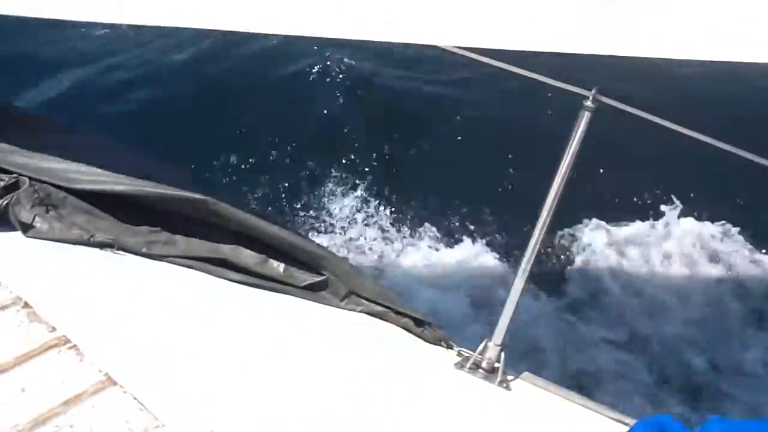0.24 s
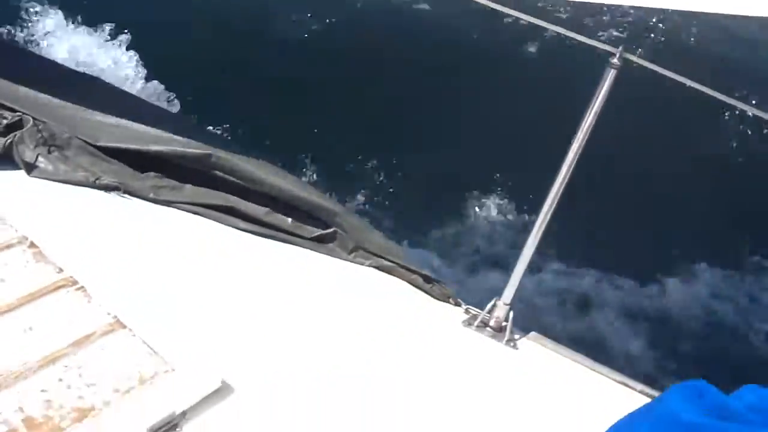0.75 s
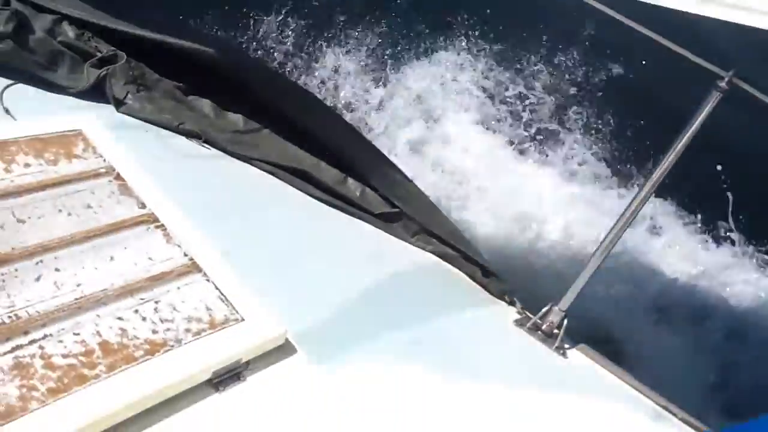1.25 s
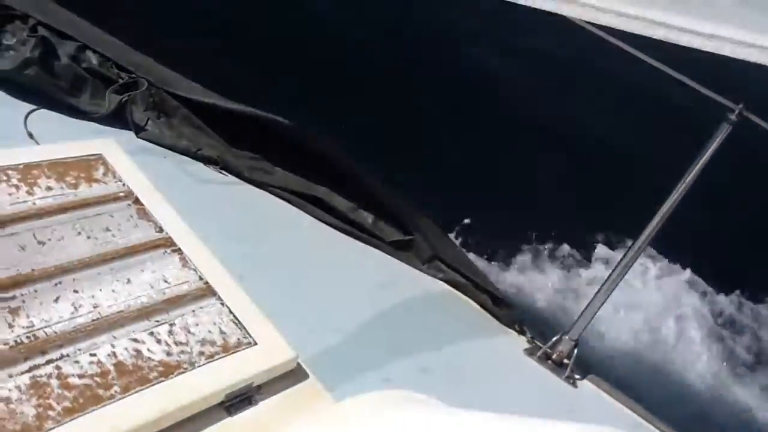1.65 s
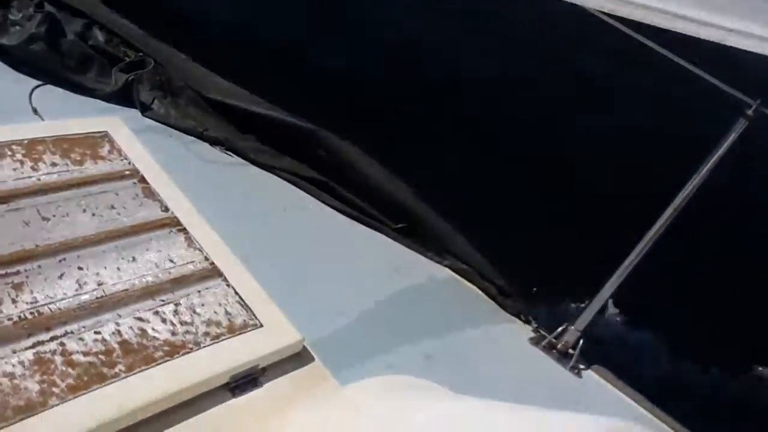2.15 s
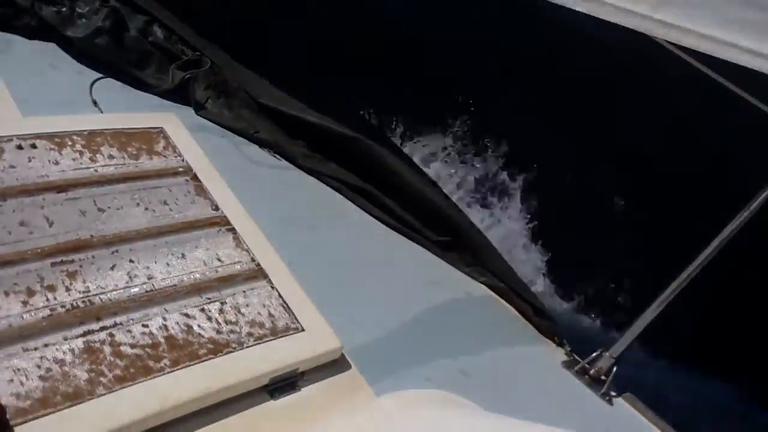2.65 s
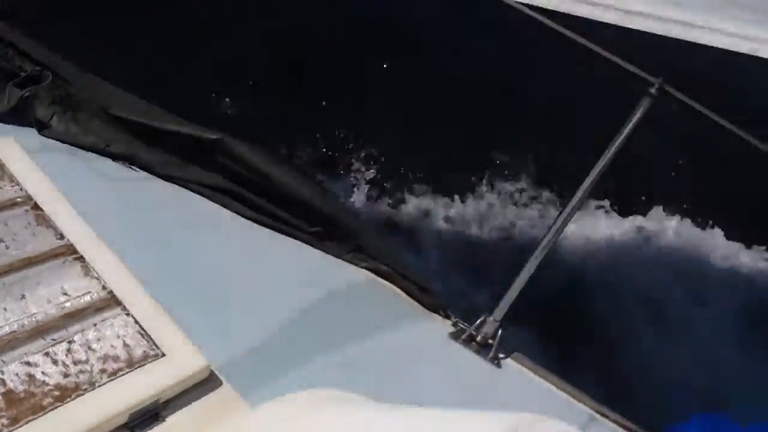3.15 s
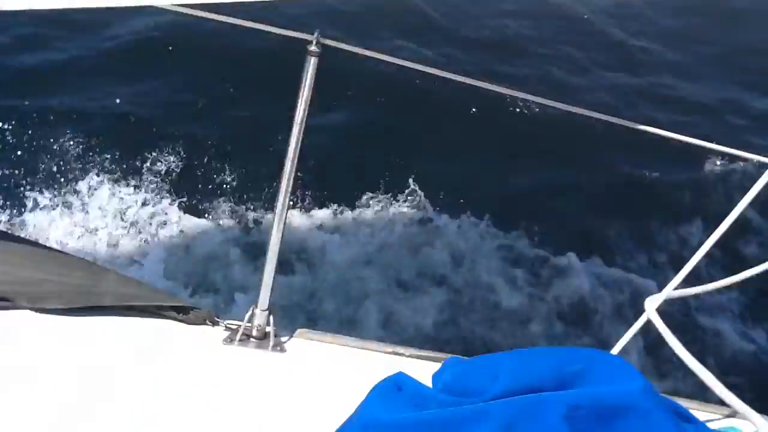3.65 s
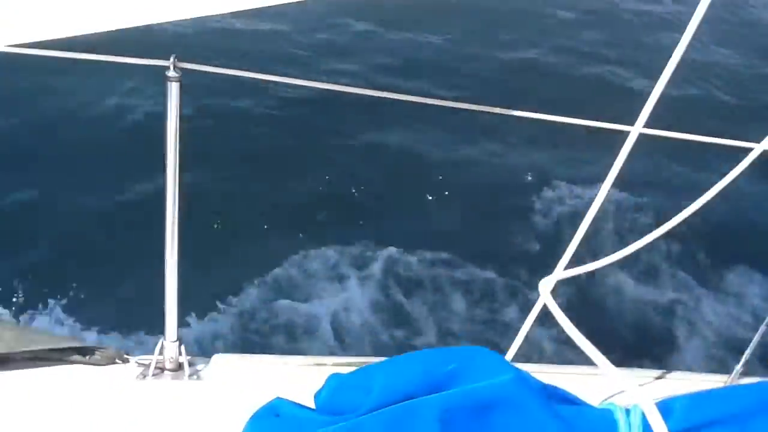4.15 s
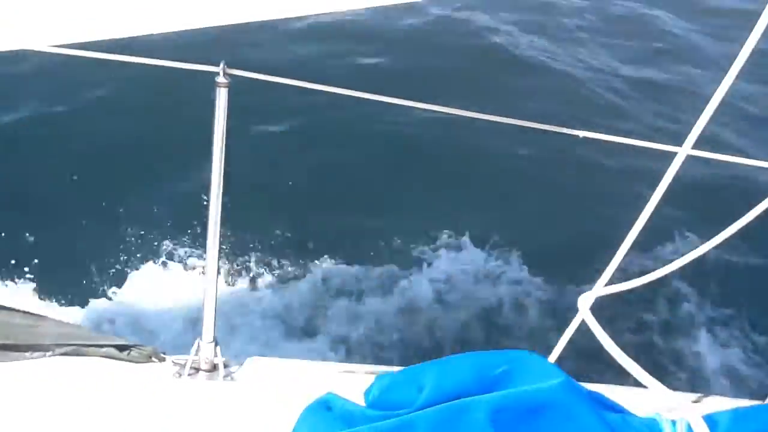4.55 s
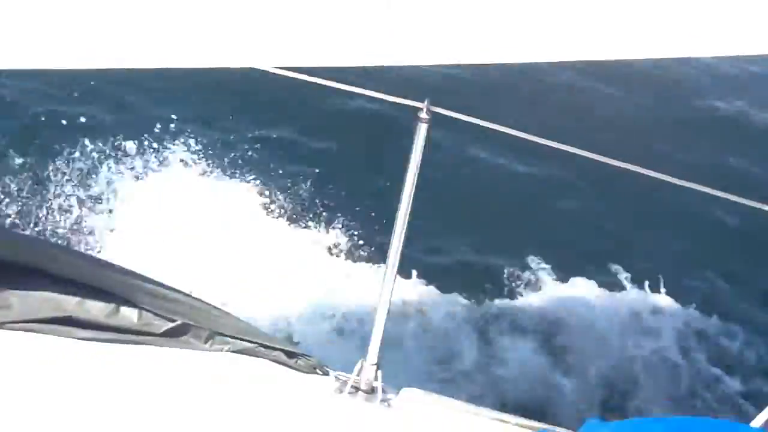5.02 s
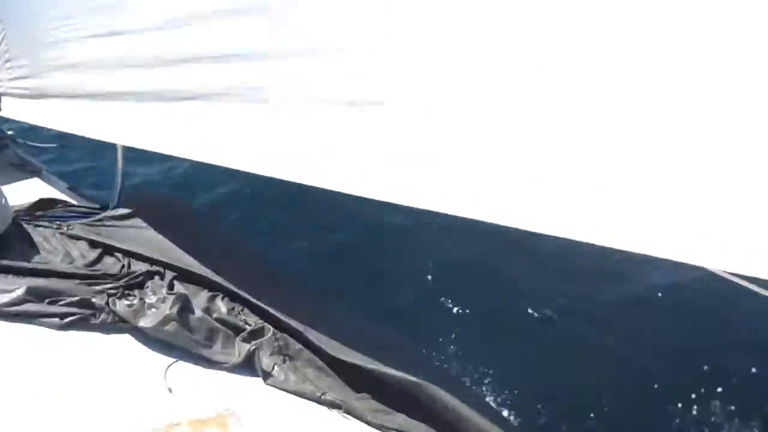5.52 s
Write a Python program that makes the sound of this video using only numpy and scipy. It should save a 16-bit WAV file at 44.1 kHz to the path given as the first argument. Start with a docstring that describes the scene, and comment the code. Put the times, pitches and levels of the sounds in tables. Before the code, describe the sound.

Sea water churns and splashes beside a moving sailing boat, under gusty wind buffeting the microphone.

```python
"""On the side deck of a sailing boat under way at sea.
From the start, the bow wave churns along the hull and breaks into hissing spray, while wind rumbles,
flutters and puffs on the microphone. The spray swells just after 1 s and again from about 3 s.
Around 4 s the hardest puffs thump, making the recorder's gain duck and creep back.
One more crest splashes just after 5 s, and the breeze eases between a few last gusts."""
import sys
import numpy as np
from scipy import signal
from scipy.fft import rfft, irfft, next_fast_len
from scipy.io import wavfile
from scipy.ndimage import uniform_filter1d, minimum_filter1d

SR = 44100
rng = np.random.default_rng(int(sys.argv[2]) if len(sys.argv) > 2 else 0)


def digitize_waveform(pressure):
    """Quantize a signal to 16-bit integers and store it at the path in sys.argv[1].

    Rows of a 2-D input are taken as channels; values are limited to [-1, 1].
    """
    field = np.atleast_2d(pressure).T
    bounded = np.clip(field, -1, 1)
    quanta = np.round(bounded * 32767).astype(np.int16)
    wavfile.write(sys.argv[1], SR, quanta)


N = 254898

# Water and wind levels are relative: each sound adds its own offset.
# Crests breaking along the hull: peak_s, spray_db, wash_db, spray_rise_s, spray_fall_s
CRESTS = [(.03, -46.5, -70, 0.048, 0.077), (.36, -44.5, -44, 0.18, 0.15), (1.07, -37.5, -42.5, 0.17, 0.14),
          (1.19, -36, -53, 0.14, 0.13), (1.28, -34.5, -41.5, 0.16, 0.19), (1.49, -46, -42, 0.13, .03),
          (1.7, -48.5, -41, 0.16, 0.043), (2.64, -42, -42, 0.13, 0.12), (2.97, -36, -39.5, 0.24, 0.17),
          (3.35, -38, -41.5, 0.17, 0.18), (3.59, -36.5, -37, 0.16, 0.087), (3.73, -40.5, -43.5, 0.072, 0.2),
          (4.47, -46.5, -49.5, 0.7, 0.28), (5.09, -38.5, -47, 0.14, .06), (5.15, -32.5, -40, 0.085, 0.053),
          (5.3, -45, -43, 0.29, 0.3), (5.54, -44, -56, 0.054, 0.075)]
# Clumps of spray landing on the sea: start_s, level_db, decay_s, bubble_pitch_hz
SPLASHES = [(.035, -55, .012, 1500), (0.349, -28.5, 0.0075, 1800), (2.48, -35, .025, 1900),
            (2.968, -37, 0.03, 1900), (2.981, -28, .007, 2800), (3.342, -31, 0.021, 5100),
            (5.123, -31, .02, 1600), (5.174, -33, 0.018, 2600)]
# Strength of the breeze over time: time_s, rumble_db
BREEZE_LEVELS = [(0, -28), (.55, -29.5), (.66, -33.5), (.78, -31), (1.25, -27.5), (1.55, -30.5),
                 (1.68, -26.5), (2.02, -24.5), (2.47, -31), (2.8, -27.5), (3.33, -28.5), (3.78, -26),
                 (3.89, -20.5), (4.2, -27.5), (4.46, -31), (5.03, -30), (5.45, -35), (5.78, -32)]
# Brief gusts on top of the breeze: peak_s, rumble_db, flutter_db, half_length_s
WIND_GUSTS = [(0.03, -31, -41, 0.012), (0.719, -26, -42, 0.0099), (0.8, -27, -33, 0.035),
              (0.89, -28, -34, 0.019), (1.414, -27.5, -27, 0.046), (1.676, -38, -38, 0.044),
              (2.108, -25, -31, 0.043), (2.202, -25, -31, 0.0091), (2.354, -23.5, -49, .015),
              (2.621, -21.5, -26.5, 0.044), (2.784, -46, -33, .025), (2.966, -22.5, -25.5, 0.057),
              (3.192, -27, -49, 0.039), (3.39, -38.5, -30, 0.081), (3.575, -25.5, -26, 0.048),
              (3.666, -22, -33, 0.055), (3.78, -27, -33, .04), (4.06, -28, -35, .04),
              (4.199, -21, -41, .015), (4.305, -19, -31, 0.011), (4.382, -28, -48, 0.04),
              (4.623, -29, -31, 0.017), (4.85, -34, -34, 0.0088), (5.15, -35.5, -31, 0.098),
              (5.338, -29, -33, 0.11), (5.529, -18.5, -23.5, 0.031), (5.68, -26.5, -50, 0.016)]
# Moments when the wind drops away: middle_s, rumble_drop_db, half_length_s
WIND_LULLS = [(0.33, 1, 0.017), (0.484, 3, 0.02), (0.589, 6, 0.0072), (0.67, 2, 0.024), (0.76, 5.5, 0.008),
              (0.936, 1, 0.0099), (1.325, 7, 0.0078), (1.476, 3.5, 0.033), (1.577, 4, 0.021),
              (1.823, 8.5, 0.019), (2.257, 2, 0.0063), (2.34, 12, 0.0067), (2.455, 1.5, .02),
              (2.808, 9, 0.0052), (3.057, 4, 0.011), (3.168, 11.5, 0.011), (3.314, 4.5, 0.02),
              (3.894, 9.5, 0.023), (4.423, 3, 0.015), (4.49, 6, 0.012), (4.738, -1, .01),
              (4.884, 18, 0.0087), (5.219, 9, 0.012), (5.472, 5, 0.01)]
# Puffs hitting the microphone: middle_s, peak_db, linger_s, sharpness_hz, boom_pitch_hz, boom_db
WIND_PUFFS = [(0.064, -19.5, 0.00074, 600.0, 560.0, 8), (0.1544, -14, 0.0013, 410.0, 400.0, 9),
              (0.2473, -10, 0.0005, 420.0, 211, -5), (0.257, -16, 0.0038, 740.0, 263, 4),
              (0.2824, -12.5, 0.0005, 410.0, 330.0, 8), (0.3699, -12.5, 0.0074, 320.0, 193, -2),
              (0.445, -9, 0.00046, 480.0, 550.0, 9), (0.5281, -12.0, 0.0045, 310.0, 318, -4),
              (0.5734, -16, 0.0028, 270.0, 225, 8), (0.6103, 0.5, 0.0046, 690, 400.0, 2.5),
              (0.842, -15.5, 0.0038, 580.0, 220.0, -1), (1.0126, -13, 0.0047, 400.0, 227, -2),
              (1.2086, -9.5, 0.00042, 460.0, 500, 4), (1.4322, -13, 0.00052, 230.0, 600.0, -6),
              (1.5276, -14, 0.0012, 670.0, 383, 3.5), (1.7633, -13.5, 0.0069, 460.0, 268, 7),
              (1.8619, -14, 0.0072, 260.0, 268, 2), (1.9594, -18, 0.011, 300.0, 412, 3),
              (1.9935, -15.5, 0.0037, 390.0, 314, 1), (2.043, -18.5, 0.0062, 510.0, 390.0, 17),
              (2.0843, -11, 0.0029, 240.0, 228, 4), (2.125, -16.5, 0.0076, 400.0, 460.0, 11),
              (2.168, -14, 0.0016, 340.0, 201, 4), (2.292, -12.5, 0.0083, 340.0, 191, -5.5),
              (2.638, -11, 0.0008, 480.0, 400.0, 4), (2.927, -18.5, 0.0015, 620.0, 400.0, 2.0),
              (2.941, -15, 0.0005, 250.0, 377, 7), (2.9583, -11, 0.00058, 250.0, 280.0, 4),
              (3.0045, -10.5, 0.0016, 300.0, 355, -2), (3.087, -13, 0.00056, 250.0, 170.0, 20),
              (3.221, -13.5, 0.00053, 430.0, 380, 11), (3.5197, -10.5, 0.0028, 590.0, 258, -3),
              (3.71, -14, 0.016, 600.0, 189, 4), (3.7507, -4.0, 0.0041, 380.0, 199, 2),
              (3.8005, -4, 0.0016, 650.0, 245, 0.0), (3.8327, -1, 0.0019, 800, 560.0, 3.5),
              (3.8398, -4.0, 0.0028, 276, 179, 0), (3.9313, 8, 0.0012, 800.0, 223, 6),
              (3.935, 6.5, 0.0014, 894, 247, -9), (3.939, 0.5, 0.0023, 1070, 506, -6),
              (3.9475, 3.5, 0.00053, 790.0, 377, 1), (3.955, 8, 0.0005, 520.0, 352, 2),
              (3.97, -5, 0.00087, 740.0, 590.0, -4), (4.059, -15.5, 0.0069, 620.0, 427, 2),
              (4.118, 9.5, 0.00072, 1040, 333, 8.5), (4.122, 7.0, 0.0017, 764, 213, 0),
              (4.1294, -1.5, 0.00085, 760.0, 161, 10), (4.169, -4, 0.0018, 774, 400.0, 9),
              (4.2377, -3, 0.0019, 910, 440.0, 2.0), (4.2437, 2.5, 0.0036, 700.0, 282, 3),
              (4.2548, 0, 0.0014, 760.0, 202, 1), (4.5126, -15, 0.0012, 900.0, 570.0, 6),
              (4.5254, -11, 0.0019, 750.0, 400.0, 5), (4.5338, -7.5, 0.00045, 670.0, 440.0, -1),
              (4.6734, -13.5, 0.0023, 750.0, 335, -2), (4.7016, -10, 0.0011, 950.0, 410, -0.5),
              (4.7039, 0, 0.0009, 1110, 385, 3), (4.7082, -8, 0.0024, 280.0, 180.0, 2),
              (4.836, -19.5, 0.0019, 540.0, 410.0, 1.0), (4.939, -17, 0.00097, 974, 197, -0.5),
              (5.0017, -19, 0.00094, 370.0, 421, 12), (5.0246, -12.5, 0.0005, 220.0, 457, 5),
              (5.2446, -16.0, 0.0005, 1030.0, 420.0, 5), (5.3067, -10, 0.0087, 380.0, 199, 3.5),
              (5.382, -13, 0.0017, 260.0, 250.0, 5.5), (5.5087, -10, 0.0044, 260.0, 235, 1),
              (5.53, -14, 0.004, 260.0, 298, 2), (5.6344, -17.5, 0.005, 220.0, 183, 17)]

# Tone curves, giving each sound its share of bass and treble: frequency_hz, gain_db
SPRAY_TONE = [(500, -45), (1500, -2), (3000, -2.5), (5000, -0.5), (8000, -1), (11000, -2.5), (15500, -4)]  # bright hiss
WASH_TONE = [(150, -65), (400, 3), (800, 6), (1050, 3), (1350, 2), (2000, -2.5), (3000, -7), (5000, -17),
             (12000, -37)]  # mid-pitched rush
SPLASH_TONE = [(500, 1), (1400, 14), (2200, 1), (4000, -13), (9000, -20), (15000, -24)]  # patter of drops
RUMBLE_TONE = [(20, -67), (50, -49), (75, -18), (100, -9.5), (130, -2), (170, 1), (230, -3), (330, -12.5),
               (500, -25.5), (1000, -68)]  # large swirls of air
FLUTTER_TONE = [(60, -63), (150, -10), (280, 2.5), (420, -1.5), (560, -5), (820, -13), (1050, -21.5),
                (1350, -34.5), (2200, -42), (5000, -56)]  # small swirls of air
MIC_OPENING_TONE = [(100, 3), (170, 5), (400, 1.5), (600, 0), (850, 2.5), (1060, -3.5), (1330, -0.5),
                    (2000, -4.5), (4000, 6.5), (6000, -2)]  # how the microphone's opening colours a puff


def from_db(db):
    """Turn decibels into a number to multiply a sound by."""
    return 10 ** (np.asarray(db) / 20)


def total_db(gains):
    """Level of unrelated sounds heard together: their powers add up."""
    return 10 * np.log10(sum(gain ** 2 for gain in gains))


def unit_power(x):
    """Scale a sound to an average power of 1."""
    return x / np.sqrt(np.mean(x ** 2) + 1e-20)


def evened(x, span_s):
    """Hold the power near 1 over each span_s; quicker bumps stay."""
    width = int(span_s * SR)
    return x / np.sqrt(uniform_filter1d(uniform_filter1d(x ** 2, width), width) + 1e-12)


def coloured(x, tone):
    """Filter a sound by a tone curve."""
    hz, db = np.transpose(tone)
    size = next_fast_len(2 * len(x))
    bin_hz = np.maximum(np.arange(size // 2 + 1) * SR / size, 1)
    gain = from_db(np.interp(np.log(bin_hz), np.log(hz), db))
    return irfft(rfft(x, size) * gain, size)[:len(x)]


def keep_side(x, hz, side, order):
    """Keep what lies on the "low" or "high" side of hz."""
    return signal.sosfilt(signal.butter(order, hz, side, fs=SR, output="sos"), x)


def drift(rate_hz):
    """A smooth random wobble of typical size 1 that changes about rate_hz times a second."""
    pole = np.exp(-2 * np.pi * rate_hz / SR)
    wobble = signal.lfilter([1], [1, -2 * pole, pole * pole], rng.standard_normal(N + SR))
    return unit_power(wobble[SR:])


def swell(peak_s, rise_s, fall_s, rise_shape=2, fall_shape=2):
    """A curve that rises to 1 at peak_s and falls again; shape 1 is pointed, 2 is round."""
    t = np.arange(N) / SR - peak_s
    before = (-t[t < 0] / rise_s) ** rise_shape
    after = (t[t >= 0] / fall_s) ** fall_shape
    return np.exp(-np.concatenate([before, after]))


def clicks(per_s, spread_db):
    """Random clicks; a positive spread makes a few much louder, a negative one a few softer."""
    sizes = from_db(spread_db * np.minimum(rng.exponential(1, N), 4))
    return (rng.random(N) < per_s / SR) * sizes * rng.choice([-1, 1], N)


def bubbles(per_s, low_hz, high_hz, cycles, spread_db, pitches=24):
    """Bubbles of many sizes form at random; each rings and fades by 60 dB over its cycles."""
    births = clicks(per_s, spread_db)
    pitch_index = rng.integers(0, pitches, N)
    out = 0
    for k, hz in enumerate(np.geomspace(low_hz, high_hz, pitches)):
        fade = from_db(-60 * hz / (cycles * SR))
        angle = 2 * np.pi * hz / SR
        kicks = births * (pitch_index == k) + 1e-18
        out += signal.lfilter([0, np.sin(angle)], [1, -2 * fade * np.cos(angle), fade * fade], kicks)
    return unit_power(out)


def bow_wave():
    """Levels of spray and wash: each crest swells and dies over the calmer rush along the hull."""
    sprays, washes = [from_db(-50.5)], [from_db(-48)]  # between crests
    wash_stretch = 1.22  # the wash swells and dies more slowly than the spray
    pointed = dict(rise_shape=1, fall_shape=0.92)
    for peak_s, spray_db, wash_db, rise_s, fall_s in CRESTS:
        spray_swell = swell(peak_s, rise_s, fall_s, **pointed)
        wash_swell = swell(peak_s, wash_stretch * rise_s, wash_stretch * fall_s, **pointed)
        sprays.append(from_db(spray_db) * spray_swell)
        washes.append(from_db(wash_db) * wash_swell)
    heave_db = 0.33 * drift(rate_hz=37)  # the water heaves unevenly
    return total_db(sprays) + heave_db, total_db(washes) + heave_db


def spray(level_db):
    """Bursting foam hisses; falling drops add a fine patter and a few near ones tick."""
    foam = rng.standard_normal(N) * from_db(0.78 * drift(rate_hz=54))
    drops = bubbles(per_s=1900, low_hz=2080, high_hz=14400, cycles=2.3, spread_db=6)
    ticks = unit_power(clicks(per_s=72, spread_db=-3))
    hiss = foam + from_db(-11) * drops + from_db(-11.5) * ticks
    return from_db(level_db + 2) * unit_power(coloured(hiss, SPRAY_TONE))


def wash(level_db):
    """Water tumbles off the hull in a rush full of larger bubbles."""
    churn = rng.standard_normal(N) * from_db(1.7 * drift(rate_hz=14))
    rush = unit_power(coloured(churn, WASH_TONE))
    gurgle = bubbles(per_s=490, low_hz=600, high_hz=3660, cycles=7.6, spread_db=0)
    return from_db(level_db) * (from_db(4) * rush + from_db(-4.5) * gurgle)


def airflow():
    """Levels of rumble and flutter: gusts ride on top of the breeze and lulls break it up."""
    usual_rumble_db, usual_flutter_db = -28.5, -34
    flutter_growth = 1.68  # in breeze and lulls, flutter moves this many dB per dB of rumble
    times_s, levels_db = np.transpose(BREEZE_LEVELS)
    breeze_db = np.interp(np.arange(N) / SR, times_s, levels_db)
    rumbles = [from_db(breeze_db)]
    flutters = [from_db(usual_flutter_db + flutter_growth * (breeze_db - usual_rumble_db))]
    for peak_s, rumble_db, flutter_db, half_s in WIND_GUSTS:
        gust = swell(peak_s, half_s, half_s)
        rumbles.append(from_db(rumble_db) * gust)
        flutters.append(from_db(flutter_db) * gust)
    lull_db = sum(drop_db * swell(middle_s, half_s, half_s) for middle_s, drop_db, half_s in WIND_LULLS)
    return total_db(rumbles) - lull_db, total_db(flutters) - flutter_growth * lull_db


def wind(rumble_db, flutter_db):
    """Large swirls of air rumble; small ones come in bunches and flutter at the microphone's opening."""
    bunching = drift(rate_hz=21.5)
    large = rng.standard_normal(N) * from_db(2 * bunching)
    small = clicks(per_s=700, spread_db=5.5) + 0.24 * rng.standard_normal(N)
    small *= from_db(1.4 * bunching)
    rumble = from_db(rumble_db + 2) * evened(coloured(large, RUMBLE_TONE), span_s=0.037)
    flutter = from_db(flutter_db + 2) * evened(coloured(small, FLUTTER_TONE), span_s=0.034)
    return rumble + flutter


def splashes():
    """Each clump of spray lands as a quick, dying shower of drops and traps bubbles of about one size."""
    t = np.arange(N) / SR
    patter = unit_power(coloured(clicks(per_s=3000, spread_db=2.5), SPLASH_TONE))
    trapped = clicks(per_s=1500, spread_db=2.5)
    out = np.zeros(N)
    for start_s, level_db, decay_s, pitch_hz in SPLASHES:
        ring = unit_power(signal.lfilter(*signal.iirpeak(pitch_hz, Q=5, fs=SR), trapped))
        fade = (t >= start_s) * np.exp(-np.abs(t - start_s) / decay_s)
        out += from_db(level_db - 5.5) * fade * (patter + from_db(-1) * ring)
    return out


def puff(linger_s, sharpness_hz, boom_hz, boom_db, low_cut_hz=116, size=2048):
    """A whirl of air jerks the pressure to and fro: a thud that booms at the rate of the swings."""
    hz = np.maximum(np.arange(size // 2 + 1) * SR / size, 1)
    turns, swing_s = np.arange(-6, 7), 0.5 / boom_hz
    times_s = swing_s * (turns + rng.uniform(-0.38, 0.35, len(turns)) * (turns != 0))
    uneven = from_db(rng.normal(0, 1.5, len(turns)))
    abruptness = 2.63  # 2 would start and stop more gently
    fade = np.exp(-2 * np.abs(times_s / (linger_s + swing_s)) ** abruptness)
    heights = (-1.0) ** turns * fade * uneven
    # Turn the swings into a spectrum, then level it so the thud covers many pitches.
    swings = heights @ np.exp(-2j * np.pi * hz * times_s[:, None])
    broad = swings / np.sqrt(uniform_filter1d(np.abs(swings) ** 2, size=19, mode="mirror") + 1e-3)
    treble_cut = 1 / (1 + (hz / sharpness_hz) ** 2) / np.sqrt(1 + (hz / (2.8 * sharpness_hz)) ** 12)
    boom = from_db(boom_db * np.exp(-(np.log2(hz / boom_hz) / 0.82) ** 2))
    bass_cut = 1 / np.sqrt(1 + (low_cut_hz / hz) ** 6)
    thud = np.roll(irfft(broad * treble_cut * boom * bass_cut), size // 2)
    pressure = coloured(thud, MIC_OPENING_TONE)
    return pressure / np.abs(pressure).max()


def puffs():
    """Each puff hits the microphone at its own moment and strength."""
    out = np.zeros(N + SR)
    for middle_s, peak_db, linger_s, sharpness_hz, boom_hz, boom_db in WIND_PUFFS:
        thud = from_db(peak_db) * puff(linger_s, sharpness_hz, boom_hz, boom_db)
        start = max(int(middle_s * SR) - len(thud) // 2, 0)
        out[start:start + len(thud)] += thud
    return out[:N]


def gain_control(x, ceiling_db, release_db_per_s, attack_s):
    """Peaks over the ceiling turn the volume down at once; it creeps back at a steady rate."""
    excess_db = np.maximum(20 * np.log10(np.abs(x) + 1e-9) - ceiling_db, 0)
    recovery_db = release_db_per_s * np.arange(N) / SR
    duck_db = np.maximum.accumulate(excess_db + recovery_db) - recovery_db
    width = int(attack_s * SR)
    smooth_gain_db = uniform_filter1d(minimum_filter1d(-duck_db, width), width)
    return x * from_db(smooth_gain_db)


def overload(x, threshold, squash):
    """Big swings are squashed on one side only; the lopsided peaks leave a deep thump."""
    lost = squash * np.maximum(x - threshold, 0)
    dulled = keep_side(lost, hz=1600, side="low", order=2)
    return x - keep_side(dulled, hz=22, side="high", order=1)


def scene():
    """Water beside the hull and wind on the microphone, in one channel."""
    spray_db, wash_db = bow_wave()
    water = spray(spray_db) + wash(wash_db) + splashes()
    air = wind(*airflow()) + puffs()
    return (water + air)[None]


def record(dry):
    """The hardest puffs duck the gain and overload the recorder; the highest treble is cut off."""
    held = gain_control(dry[0], ceiling_db=-2.8, release_db_per_s=27, attack_s=0.001)
    squashed = overload(held, threshold=0.45, squash=0.8)
    cutoff_hz = 15500
    steep_cut = signal.ellip(12, rp=0.1, rs=90, Wn=cutoff_hz, fs=SR, output="sos")
    return signal.sosfilt(steep_cut, squashed)[None]


dry = scene()
out = record(dry)
digitize_waveform(out)
```